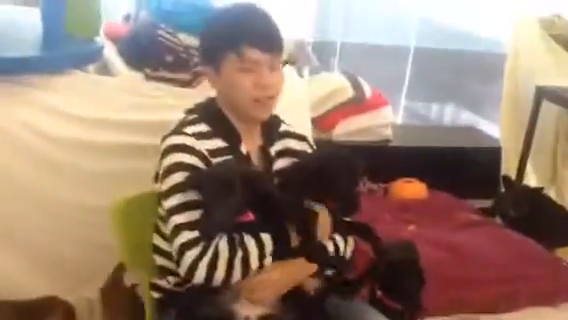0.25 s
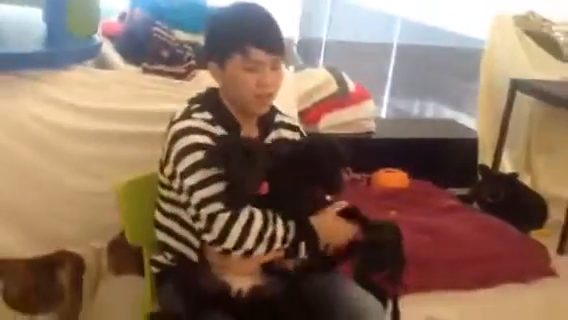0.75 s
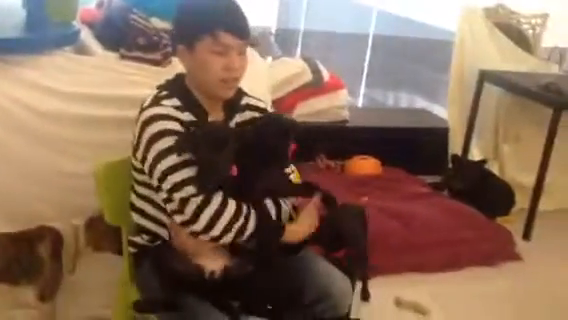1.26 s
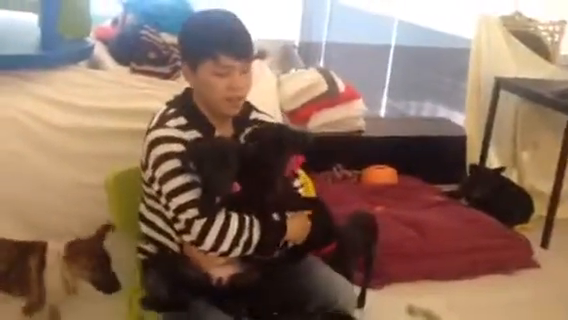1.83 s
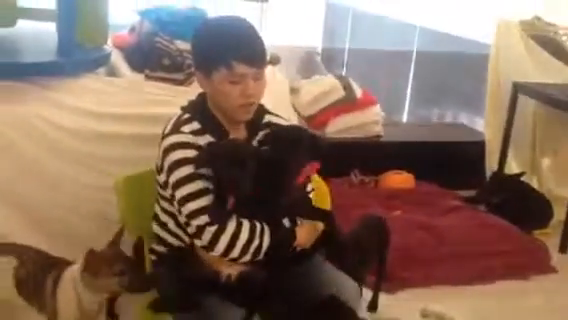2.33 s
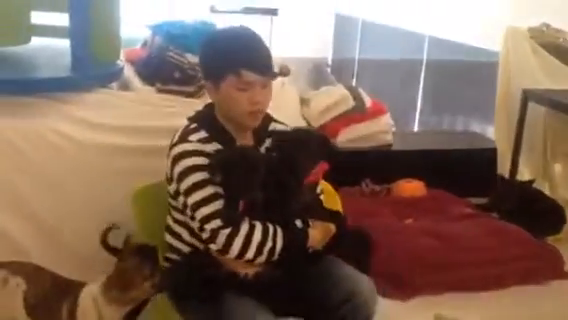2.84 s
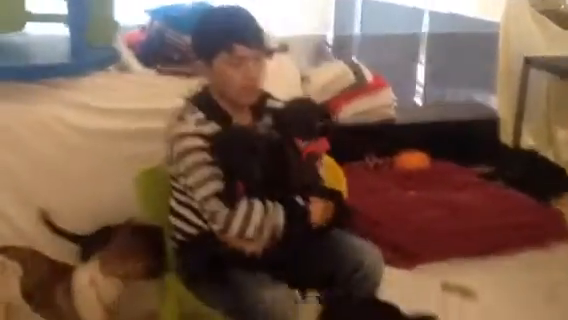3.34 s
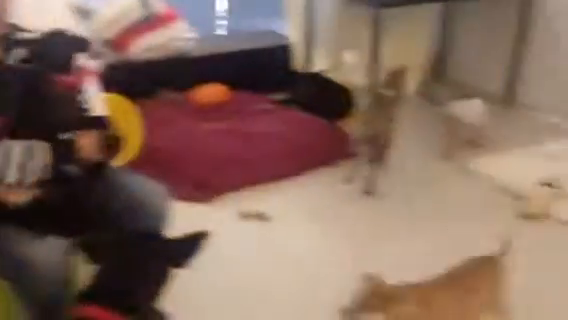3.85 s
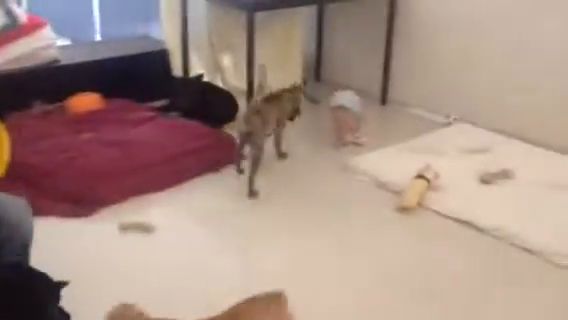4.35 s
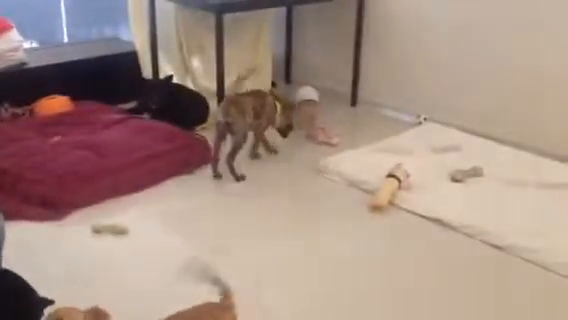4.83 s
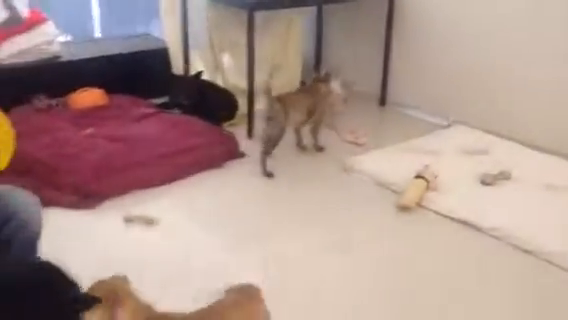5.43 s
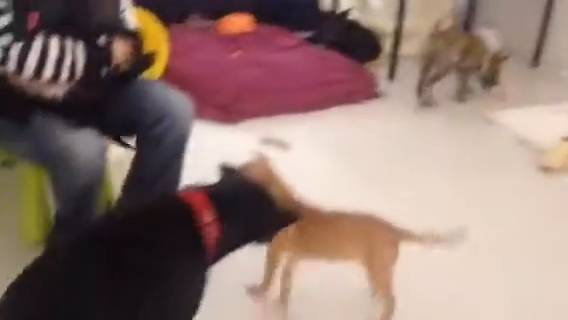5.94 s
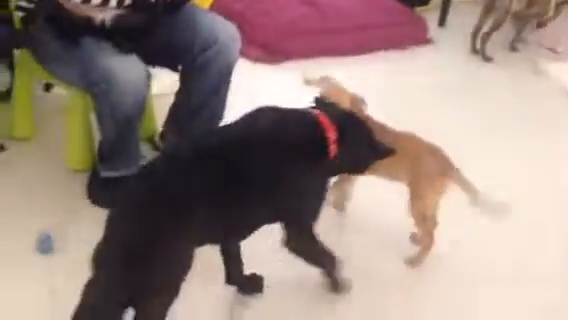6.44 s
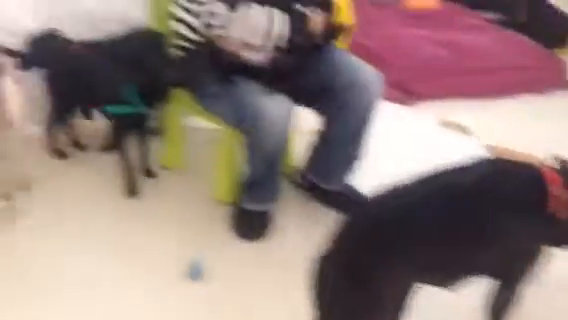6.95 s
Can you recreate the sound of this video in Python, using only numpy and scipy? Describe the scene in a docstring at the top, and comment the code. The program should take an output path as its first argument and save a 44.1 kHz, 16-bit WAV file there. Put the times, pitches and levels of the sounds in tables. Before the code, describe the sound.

A rubber squeaky toy sounds among young dogs in a bare room, each high squeak trailing about a second of echo. A stepped, rising squeak comes at 0.1 seconds, then the two loudest, sharp upward sweeps, at 0.9 and 1.4. Claws tick and a collar tag tinkles faintly around 2 seconds. Another climbing squeak at 2.7 leads into quick chirps, some raspy, from 3 to 4.4, strongest at 3.4. Softer, lower, wavering chewed squeaks follow from 4.6 to 5. Light claw clicks and faint tag jingles fill the gap until a soft floor thud at 6.4. Wobbling chewed squeaks then run to about 7, with one last small squeak just after. The dogs' movements sound slightly nearer than the toy. Faint claw patter continues throughout, over quiet ventilation, street noise, a low building hum and a slight hiss.

```python
"""A rubber squeaker toy is squeezed and chewed among young dogs in a bare, hard-floored room.
Air pressure sets its reed beating, and the tube filters the resulting harmonic series; the pitch glides
with the pressure and the tone smears into the room's long reverberation. Claws tick on the floor,
a collar tag jingles in its free modes and a floorboard gives one soft thud. Beneath them lie
ventilation, street noise, the low hum of the building and a faint narrow hiss."""
import sys
import numpy as np
from scipy import signal
from scipy.fft import rfft, irfft
from scipy.io import wavfile
from scipy.ndimage import uniform_filter1d

SR = 44100
rng = np.random.default_rng(int(sys.argv[2]) if len(sys.argv) > 2 else 0)


def materialize(psi):
    """Save the field psi as 16-bit PCM at rate SR to the path in sys.argv[1].

    A 1-D psi becomes a single channel; in a 2-D psi each row is a channel.
    """
    bounded = np.clip(np.atleast_2d(psi).T, -1, 1)
    quanta = np.round(bounded * 32767).astype(np.int16)
    wavfile.write(sys.argv[1], SR, quanta)


N = 316679

# Single squeezes. Each row: start in seconds, length in seconds, first and last nominal pitch in Hz,
# time constant of the glide in seconds, first and last gain in dB, then the four grip values:
# tilt in dB per partial, second-partial boost in dB, direct gain in dB, hoarseness as a share of pitch.
SQUEEZE_GLIDES = [ (0, 0.012, 2000, 2780, .05, -40, -36, -2.5, -0.5, -2, 0.13),
                  (0.895, .105, 1618, 3364, 0.016, -33, -12.5, 1.5, 0, -10, 0.0092),
                  (1.365, .122, 1543, 3554, .029, -34, -16.5, 2, -1.5, -3.5, 0.0065),
                  (3.039, 0.029, 1724, 1605, 0.06, -25, -41.5, 1, 0.5, -2.5, 0.14),
                  (3.128, 0.029, 1720, 3117, 0.069, -33, -27, 1.5, 0, 2.5, 0.087),
                  (3.299, 0.045, 1700, 1650, 0.088, -37, -50.5, 0.5, -2, 1, 0.069),
                  (3.44, .048, 1694, 3337, 0.018, -30, -17, 1, 1, 1, .015),
                  (3.625, 0.025, 1700, 1700, .05, -31.5, -49, -1, -4, 0.5, 0.112),
                  (3.772, .036, 1642, 3310, .02, -33, -28.5, 3, 0.3, -5.5, 0.102),
                  (4.185, 0.026, 1588, 1490, 0.0084, -40.5, -49, -5, 2, 1.5, 0.017),
                  (4.221, .033, 2246, 3850, .016, -28.5, -21.5, -2, -3, 1, 0.019),
                  (4.344, 0.018, 2300, 1590, 0.062, -41, -29, -0.3, -9, 4.5, 0.11),
                  (7.156, .028, 1636, 1762, .05, -35, -40, 2.5, 0, 5.5, .004), ]
# Held or chewed squeaks. Each row: the four grip values, then a path whose points give
# time in seconds, nominal pitch in Hz, gain in dB.
CHEW_PATHS = [ (1, 0, 1.6, 0.0038, [(2.696, 1553, -32.5), (2.722, 1566, -27.5), (2.748, 1585, -39),
              (2.765, 1655, -30), (2.8, 1717, -31.5), (2.82, 1845, -29), (2.84, 2350, -25.5),
              (2.852, 2830, -19.5), (2.86, 3260, -22)]), (0.5, 0.76, 0.48, 0.00516, [(.118, 1549, -30.5),
              (.155, 1720, -24.5), (.174, 1810, -28), (.187, 1885, -27.5), (.197, 2534, -20.5),
              (.217, 2652, -18.5), (.225, 3000, -17.5)]), (1.2, -3, 2, 0.0045, [(4.587, 1595, -34),
              (4.602, 1631, -36.5), (4.635, 1404, -41.5), (4.665, 1375, -43.5), (4.7, 1517, -40.5),
              (4.738, 1400, -56), (4.76, 1524, -48), (4.775, 1527, -46)]),
              (1.5, -5.5, 3.5, 0.005, [(4.85, 1620, -37), (4.868, 1676, -34.5), (4.93, 1618, -35),
              (4.952, 1557, -38.5), (4.972, 1365, -43.5)]), (.6, 4.5, 2.6, 0.0055, [(6.386, 1500, -40.5),
              (6.398, 1588, -37.5), (6.42, 1674, -34), (6.456, 1761, -30), (6.466, 2085, -36),
              (6.49, 2314, -27), (6.523, 2377, -31.5), (6.545, 1972, -32.5), (6.568, 2163, -34.5),
              (6.593, 1659, -32.5), (6.617, 2117, -38)]), (0.6, -2.5, 1.2, 0.0068, [(6.718, 1446, -47.5),
              (6.75, 1503, -34.5), (6.775, 1560, -41), (6.8, 1676, -32.5), (6.835, 1621, -32.5),
              (6.855, 1662, -30.5), (6.88, 1651, -32), (6.908, 1749, -31), (6.93, 1660, -41),
              (6.95, 1700, -50), (7.04, 1645, -66)]), ]
# Response of the reed's tube and the microphone. Each row: frequency in Hz, gain in dB.
TUBE_RESPONSE = [(1400, -5.5), (2000, 1.5), (2700, -2), (3500, 1.5), (4300, 3.5), (5100, 7.5), (6000, 1),
                 (7500, -9.5), (9500, -16), (11000, -32.5), (13000, -79)]
# Claws striking the floor. Each row: start in seconds, peak level in dB, centre frequency in Hz.
CLAW_STRIKES = [(0.389, -30, 2200), (0.876, -30.5, 1800), (2.163, -51.5, 5960), (2.19, -43.5, 3960),
                (2.212, -46, 2200), (2.2429, -33.5, 5400), (2.341, -36, 3500), (2.3517, -32, 2200),
                (2.805, -30, 1500), (2.97, -29.5, 925), (4.0934, -31, 1940), (5.383, -47, 8000),
                (5.588, -48, 8500), (5.883, -46, 3300), (5.96, -47, 8000), (5.986, -46, 2000),
                (6.018, -38, 1900), (6.2485, -42, 2500), (6.256, -52.5, 8000), (6.27, -42.5, 1620)]
# Blows on the collar tag. Each row: start in seconds, gain in dB, reference frequency in Hz.
TAG_STRIKES = [(1.9844, -51, 5000), (2.04, -58, 5100), (2.418, -61, 5200), (2.648, -58, 5200),
               (4.0696, -48, 4970), (4.094, -64, 5500), (5.481, -62.5, 4950), (5.718, -61, 5000),
               (5.815, -69.5, 5000), (5.953, -61, 4730), (6.022, -70, 6720)]
# Modes of the tag. Each row: ratio to the reference frequency, gain in dB, T60 in seconds.
TAG_MODES = [(0.976, 8, 0.1), (0.999, 10.5, 0.066), (1.035, -19, .06)]
# Modes of the floorboard. Each row: frequency in Hz, gain in dB, T60 in seconds.
BOARD_MODES = [(159, 0, 0.36), (214, 9, 0.11), (299, 3, .1), (387, -7.5, .08)]
# Reverberation time of the room. Each row: frequency in Hz, T60 in seconds.
REVERB_TIMES = [(300, 0.39), (1500, 1.0), (2700, 0.99), (5000, 0.86), (8000, 0.77), (11000, 0.48)]
# Ventilation and street noise. Each row: frequency in Hz, relative spectral density in dB.
HUSH_SPECTRUM = [(35, -33.5), (60, -36), (113, -16.5), (168, -6), (318, 1), (515, -7.5), (816, -6.5),
                 (1320, -14.5), (2850, -20.5), (4820, -31.5), (8910, -26.5), (10400, -34), (11300, -68),
                 (14700, -91.5), (22000, -120)]
# Low hum of the building, plus a faint narrow hiss near 4.8 kHz.
# Each row: centre frequency in Hz, bandwidth in Hz, rms level in dB.
NARROW_BANDS = [(88, 16, -76.5), (168.6, 18, -59.5), (306, 8.1, -58.5), (4780, 350, -74.5)]

REED_REST_HZ, TILT_DB_PER_OCTAVE, CREEP_HZ_PER_S = 1600, 3.5, 1150
CATCH_FLAT, CATCH_S = 0.056, 0.0039  # the reed starts flat by this share, then settles
SWELL_DB, SWELL_S = -4.5, 0.0091  # the tone starts softer, then fills in
WOBBLE_SHARE, FLUTTER_DB, LEAK_DB, GLIDE_RASP_S = 0.0049, 3, -25.5, 0.002
SHADE_HZ = 6900  # fur and arms in the way dull the toy's direct sound above this
PATTER_DB, PATTER_HZ = -55, 3000
THUD_START_S, THUD_PUSH_S, THUD_GAIN = 6.372, 0.0025, 0.3115
ROOM_DB, ROOM_FILL_S, EARLY_DB, EARLY_T60_S = 0.5, 0.0061, 0.5, 0.095
DOGS_REVERB_DB = -1.5  # the dogs are nearer than the toy
HUSH_DB = -50.5


def squeaker():
    """A beating reed chops the airflow into harmonics. Returns the sound and its direct-path gain."""
    out, direct_gain = np.zeros(N), np.ones(N)
    wobble, rasp, flutter = walk(150), walk(1200), walk(90)
    air_leak = level(band(rng.standard_normal(N), 5600, 3400), LEAK_DB)
    squeaks = [squeeze(*row) for row in SQUEEZE_GLIDES] + [chew(*row) for row in CHEW_PATHS]
    for start_s, hz, db, (tilt_db, second_db, direct_db, hoarseness) in squeaks:
        start = int(start_s * SR)
        span = np.arange(start, min(start + len(hz), N))
        t = (span - start) / SR
        hz = hz[:len(t)] * (1 - CATCH_FLAT * np.exp(-t / CATCH_S))
        db = db[:len(t)] + SWELL_DB * np.exp(-t / SWELL_S) + FLUTTER_DB * flutter[span]
        tilt_db = tilt_db + TILT_DB_PER_OCTAVE * np.log2(hz / REED_REST_HZ)
        # the faster the pitch is forced to move, the less evenly the reed beats
        glide_rate = np.abs(np.gradient(np.log(hz))) * SR
        roughness = hoarseness + np.minimum(GLIDE_RASP_S * glide_rate, .05)
        jitter = WOBBLE_SHARE * wobble[span] + roughness * rasp[span]
        phase = 2 * np.pi * np.cumsum(hz * (1 + jitter)) / SR
        tone = 0
        for k in range(1, 8):
            partial_db = on_log(k * hz, TUBE_RESPONSE) + tilt_db * (k - 2) + second_db * (k == 2)
            tone += undb(partial_db) * np.sin(k * phase)
        gate = np.clip(np.minimum(t, t[-1] - t) / .003, 0, 1)  # catches and stops in 3 ms
        out[span] += gate * undb(db) * (tone + air_leak[span])
        direct_gain[span] = undb(direct_db)
    return out, direct_gain


def squeeze(start_s, length_s, first_hz, last_hz, glide_s, first_db, last_db, *grip):
    """Pressure governs the reed: pitch creeps up, then runs exponentially to its end value with level."""
    t = np.arange(int(length_s * SR)) / SR
    glide = np.expm1(t / glide_s) / np.expm1(length_s / glide_s)
    glide_hz = last_hz - first_hz - CREEP_HZ_PER_S * length_s
    hz = first_hz + CREEP_HZ_PER_S * t + glide_hz * glide
    return start_s, hz, first_db + (last_db - first_db) * glide, grip


def chew(*row):
    """The jaws modulate the reed in frequency and amplitude, so the squeak steps and wanders."""
    *grip, path = row
    times, hz, db = np.transpose(path)
    t = np.arange(times[0], times[-1], 1 / SR)
    return times[0], np.interp(t, times, hz), np.interp(t, times, db), grip


def dogs():
    """Impacts superpose: claws, the tag's modes in a new balance at each blow, light paws, a thud."""
    out = np.zeros(N)
    for start_s, db, hz in CLAW_STRIKES:
        add(out, start_s, claw_tick(hz, db))
    for start_s, db, hz in TAG_STRIKES:
        modes = [(hz * ratio, mode_db + 4.3 * rng.standard_normal(), t60)
                 for ratio, mode_db, t60 in TAG_MODES]
        add(out, start_s, undb(db) * ring(modes))
    for when, softness, pitch in rng.random(size=(110, 3)):
        hz = PATTER_HZ * 2 ** (3 * pitch - 1.5)
        add(out, when * N / SR, claw_tick(hz, PATTER_DB - 3.5 * np.log(softness + .03)))
    add(out, THUD_START_S, floor_thud())
    return out


def claw_tick(hz, db):
    """A brief impact has a wide spectrum: noise round the claw's resonance, over a broad click."""
    burst = rng.standard_normal(1024) * np.exp(-np.arange(1024) / (0.0022 * SR))
    tick = band(burst, hz, 0.66 * hz) + undb(-11) * band(burst, 3000, 6000)
    return tick * undb(db) / np.abs(tick).max()


def floor_thud():
    """A push drives the floorboard's modes; the recoil that follows cancels the deepest bass."""
    push = np.hanning(int(THUD_PUSH_S * SR))
    force = np.convolve(push / push.sum(), [1, -1])
    return THUD_GAIN * np.convolve(ring(BOARD_MODES), force)


def ring(modes):
    """Free vibration after a blow is a sum of exponentially damped sinusoids."""
    t = np.arange(SR // 2) / SR
    return sum(undb(db - 60 * t / t60) * np.sin(2 * np.pi * hz * t) for hz, db, t60 in modes)


def room(x):
    """Reverberation: reflections build up and decay, lasting longest in the midrange."""
    t = np.arange(SR) / SR
    noise = rng.standard_normal(SR)
    tail = sum(band(noise, hz, hz / 0.88) * undb(-60 * t / on_log(hz, REVERB_TIMES))
               for hz in 80 * 2 ** np.arange(0, 7.6, .5))
    build_up = 1 - np.exp(-t / ROOM_FILL_S)
    near_walls = 1 + undb(EARLY_DB - 60 * t / EARLY_T60_S)
    response = level(tail * build_up * near_walls, ROOM_DB) / np.sqrt(SR)
    return signal.fftconvolve(x, response)[:N]


def background():
    """Noise bands add incoherently: wavering ventilation and street, a low hum, a faint narrow hiss."""
    hush, swell = 0, walk(4.47)
    for hz in 45 * 2 ** np.arange(0, 8.1, .5):
        db = on_log(hz, HUSH_SPECTRUM) + 1.2 * swell + 1.9 * walk(6)
        hush += undb(db) * band(rng.standard_normal(N), hz, hz / 2.4)
    hum_and_hiss = sum(level(band(rng.standard_normal(N), hz, width), db)
                       for hz, width, db in NARROW_BANDS)
    return level(hush, HUSH_DB) + hum_and_hiss


def undb(db):
    """Amplitude grows tenfold for every 20 dB."""
    return 10 ** (np.asarray(db) / 20)


def level(x, db):
    """Scaling sets the rms level in dB."""
    return x * undb(db) / np.sqrt(np.mean(x ** 2))


def on_log(hz, table):
    """Interpolation reads a table on a logarithmic frequency axis."""
    freqs, values = np.transpose(table)
    return np.interp(np.log(np.maximum(hz, 1)), np.log(freqs), values)


def band(x, hz, width):
    """A Gaussian window on the spectrum acts as a band-pass filter."""
    freqs = np.arange(len(x) // 2 + 1) * SR / len(x)
    return irfft(rfft(x) * np.exp(-2 * ((freqs - hz) / width) ** 2), len(x))


def walk(rate_hz):
    """Random steps, averaged twice, give a smooth fluctuation."""
    hold = int(SR / rate_hz)
    steps = np.repeat(rng.standard_normal(N // hold + 1), hold)
    return 0.91 * uniform_filter1d(uniform_filter1d(steps, hold), hold)[:N]


def add(out, start_s, x):
    """Superposition: x adds to out from its start time."""
    start = int(start_s * SR)
    out[start:start + len(x)] += x[:N - start]


def scene():
    """The sound field is the sum of direct sound, reverberation and background."""
    toy, direct_gain = squeaker()
    direct_toy = signal.sosfilt(signal.butter(2, SHADE_HZ, fs=SR, output="sos"), toy * direct_gain)
    impacts = dogs()
    reverberation = room(toy + undb(DOGS_REVERB_DB) * impacts)
    return (direct_toy + impacts + reverberation + background())[None]


def record(dry):
    """The microphone is band-limited: it passes 82 Hz to 11250 Hz."""
    low_cut = signal.sosfilt(signal.butter(5, 82, "high", fs=SR, output="sos"), dry)
    return signal.sosfilt(signal.ellip(12, .2, 90, 11250, fs=SR, output="sos"), low_cut)


dry = scene()
out = record(dry)
materialize(out)
```